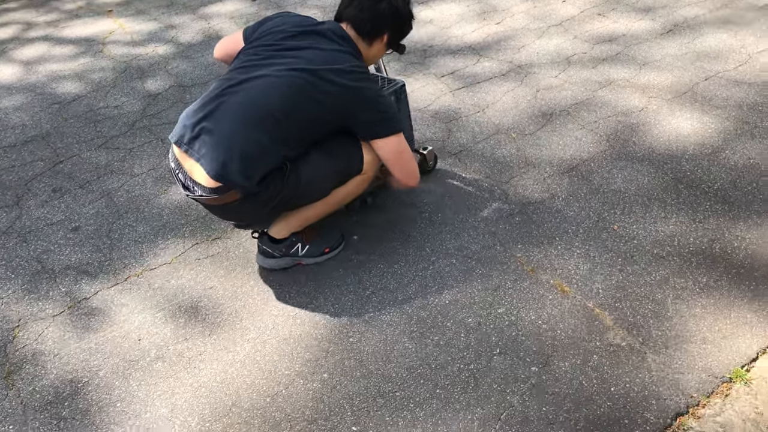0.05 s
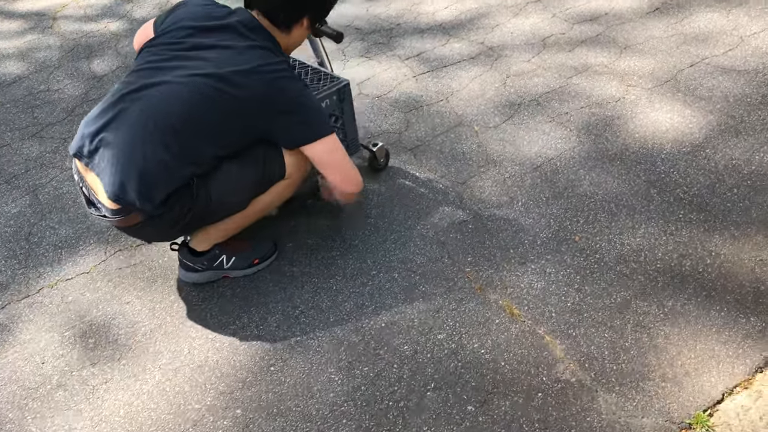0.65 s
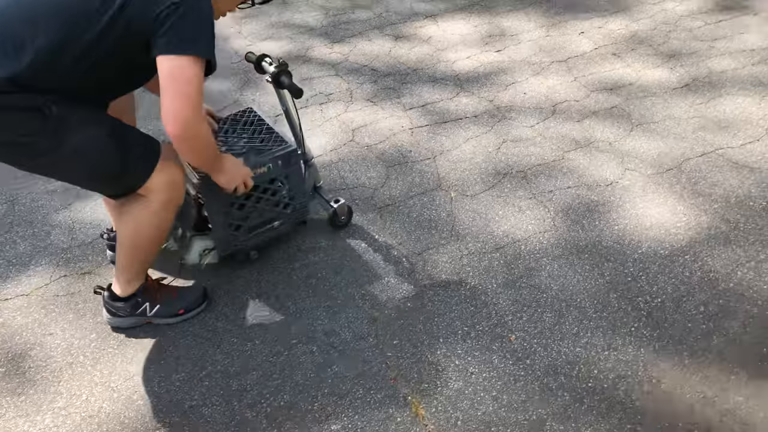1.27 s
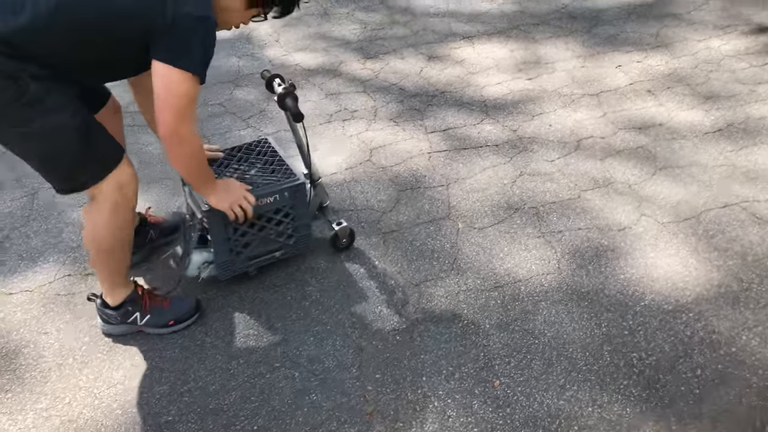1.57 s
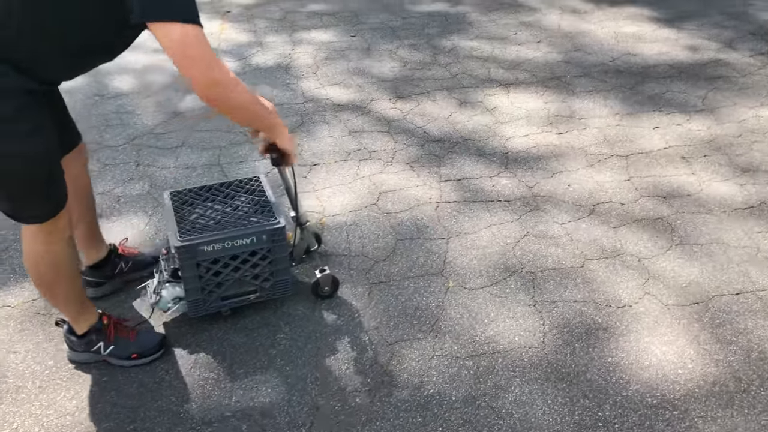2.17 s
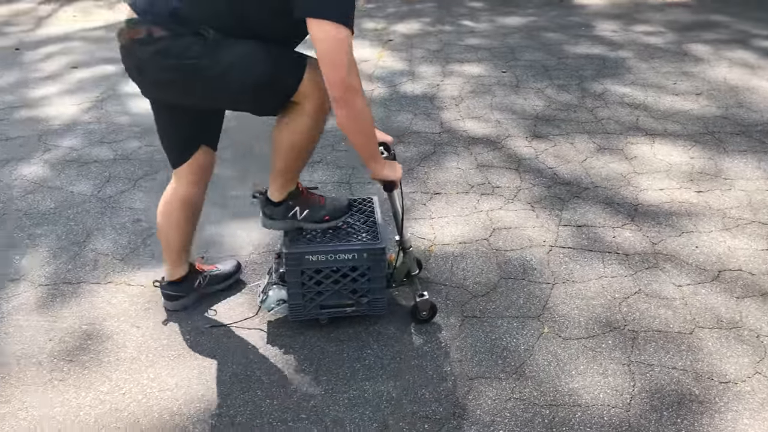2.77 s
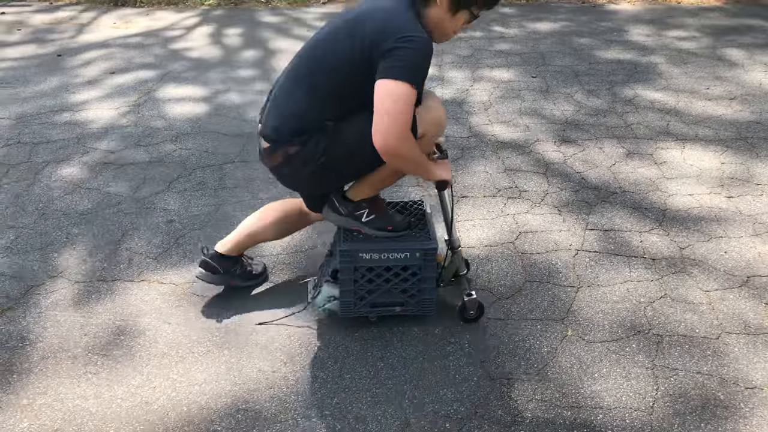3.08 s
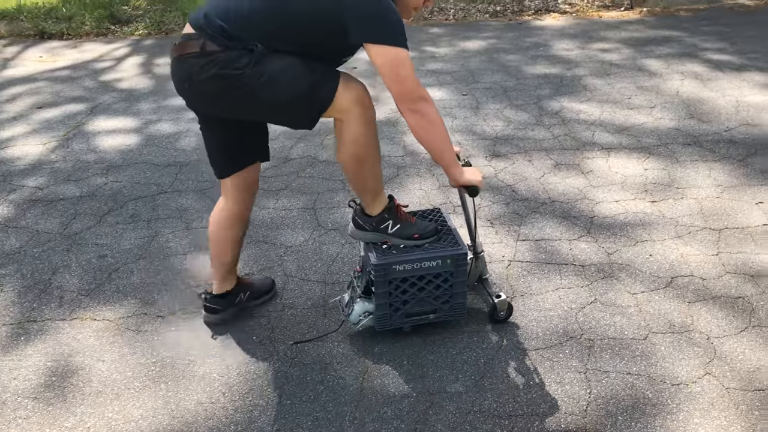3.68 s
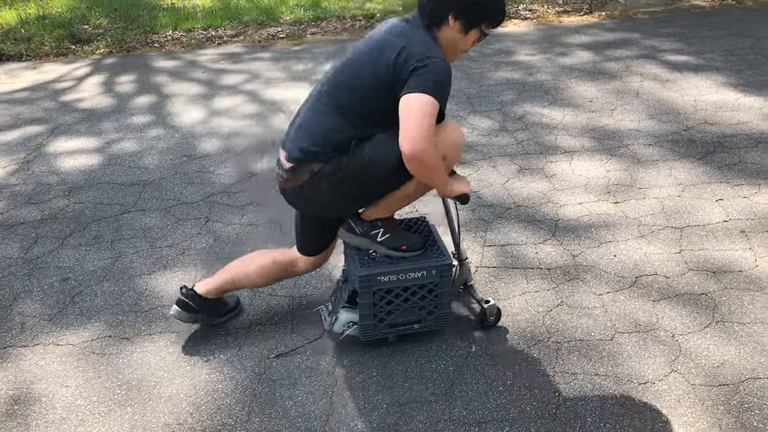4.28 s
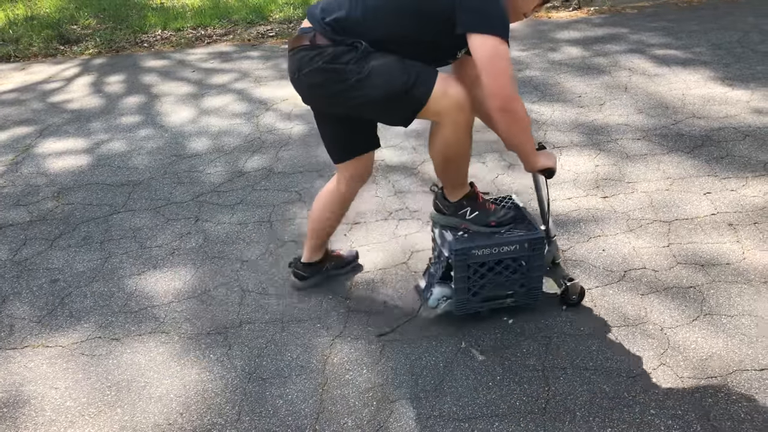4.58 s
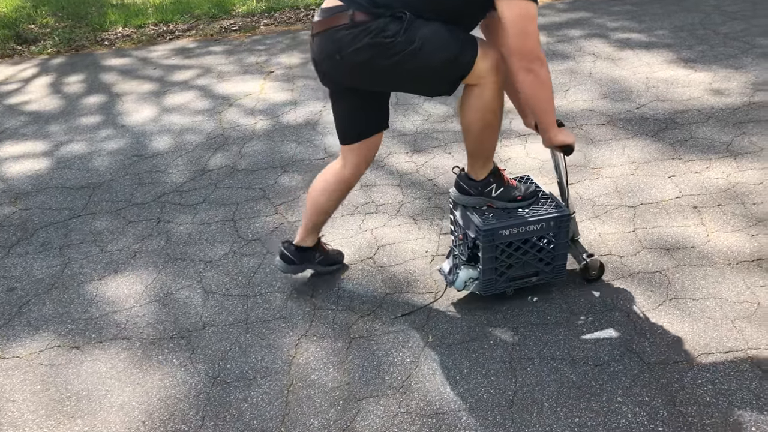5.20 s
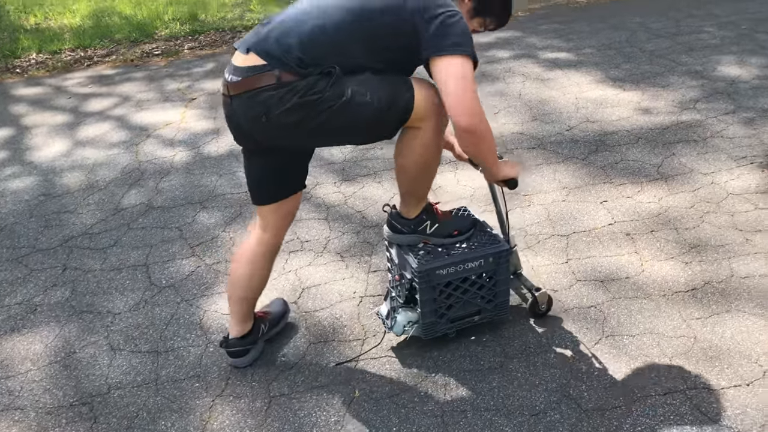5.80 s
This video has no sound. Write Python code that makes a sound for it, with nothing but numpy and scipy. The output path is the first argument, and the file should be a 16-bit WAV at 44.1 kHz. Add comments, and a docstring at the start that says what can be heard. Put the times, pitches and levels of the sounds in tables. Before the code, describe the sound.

Soft cloth rustle and a string of hollow plastic knocks come first, mixed with gritty scrapes as a home-made crate kart is dragged round on asphalt. Two loud runs of its drive follow, each under a second, with a lumpy wheel drumming fast while the chain and steel parts clatter. The kart then rolls out with a few small bumps and clinks. The sound is mono and close, outdoors, over a low rumble of distant traffic.

```python
"""A quiet asphalt street, one microphone, traffic far off. A home-made kart, a plastic crate on a
scooter frame, is handled: the crate knocks, clothes rustle, the wheels skid on grit as it is dragged
round. The rider steps on, and twice the drive spins up and runs down: a lumpy wheel thumps once a turn
while the chain and loose steel rattle. Then the kart jiggles over rough spots and coasts to a stop."""
import sys
import numpy as np
from scipy import signal
from scipy.fft import rfft, irfft
from scipy.io import wavfile
from scipy.ndimage import uniform_filter1d

SR = 44100
rng = np.random.default_rng(int(sys.argv[2]) if len(sys.argv) > 2 else 0)


def to_wav(s):
    """Save 16-bit WAV."""
    ch = np.atleast_2d(s).T  # columns
    pcm = np.round(np.clip(ch, -1, 1) * 32767)  # PCM
    wavfile.write(sys.argv[1], SR, pcm.astype(np.int16))


N = 257984
TIME = np.arange(N) / SR
RING = np.arange(SR // 3) / SR  # time within one blow, s
BASS, MIDDLE, TREBLE = (130, 570), (570, 2700), (2700, 17000)  # band edges, Hz
ATTACK_S = 0.012
FULL_SPEED = 35  # wheel turns per second

# the two runs of the drive, each a list of: t/s, wheel speed/(turns per s)
DRIVE_RUNS = [
    [(3.13, 14.46), (3.19, 18.36), (3.25, 35.55), (3.32, 37.41), (3.41, 35.41), (3.5, 22.7), (3.62, 4.13)],
    [(4.355, 6.99), (4.42, 25.06), (4.48, 34.78), (4.6, 32.91), (4.74, 29.39), (4.85, 19.06), (5.0, 5.57)],
]
# spectrum of steel hitting steel: f/Hz, level/dB
STEEL_SPECTRUM = [(300, 13.5), (650, -5), (1050, 0), (1900, -1.5), (2600, -8.5), (4000, -4.5), (6000, 5.5),
                  (8500, 1.5), (10000, -6), (13000, -7.5), (16000, -4)]
# broad resonances of the steel parts: f/Hz, width/Hz, level/dB relative to that spectrum
STEEL_PEAKS = [(1626, 240, 4), (3146, 107, 15), (3440, 190, 13), (4390, 230, 11.5), (6200, 300, 3.5),
               (6460, 250, 2.5), (8300, 550, -17), (11130, 940, 15.5), (14600, 197, 18.5)]
# clear ringing of the steel frame: f/Hz, level/dB, t60/s
STEEL_MODES = [(1067, -3.5, 0.092), (1497, 7, 0.094), (1603, -6, 0.32), (3020, -10.5, 0.43),
               (3365, 2, 0.16), (4646, -5.5, 0.36), (5880, -2, 0.092), (7040, 13.5, 0.043),
               (7030, 0, 0.033), (7650, -9, .14), (10000, -17, 0.29)]
# spectrum of the plastic crate: f/Hz, level/dB
CRATE_SPECTRUM = [(100, 4), (300, 9.5), (520, -5), (850, 1), (1600, 1.5), (2600, -13), (3500, -9),
                  (4700, -14), (6000, -22), (10000, -26), (16000, -35)]


def wheel(full_db=-16.5, growth=0.65):
    """One thump a turn, harder at speed; also gives the jolt that each turn passes to the chain."""
    # single slow bumps of a wheel: t/s, level/dB
    bumps = [(3.801, -34), (5.332, -26.5), (5.378, -52)]
    out, jolt, shape = np.zeros(N), np.zeros(N), thump()
    for run in DRIVE_RUNS:
        speed = np.interp(TIME, *np.transpose(run), left=0, right=0)
        turns = np.cumsum(speed) / SR
        jolt += np.cos(2 * np.pi * (turns - 0.08)) * (speed > 0)
        for i in np.flatnonzero(np.diff(np.floor(turns)) > 0):
            gain = amp(full_db + 0.18 * rng.standard_normal()) * (speed[i] / FULL_SPEED) ** growth
            add(out, TIME[i] - ATTACK_S, gain * shape)
    for s, db in bumps:
        add(out, s - ATTACK_S, amp(db) * shape)
    return out, jolt


def thump(lead_s=0.00625, touch_gain=0.52, touch_hz=190, slap_hz=165):
    """The lump touches, then slaps the road: two soft pushes, and the frame rings."""
    # low ringing of the loaded frame: f/Hz, level/dB, t60/s
    frame_modes = [(75, -14, 0.092), (99.7, -15, 0.12), (196.5, -7.5, 0.071), (223, -46, 0.037)]
    t = RING - ATTACK_S
    touch = (np.pi * touch_hz * (t + lead_s)) ** 2
    slap = (np.pi * slap_hz * t) ** 2
    pushes = touch_gain * (1 - 2 * touch) * np.exp(-touch) + (1 - 2 * slap) * np.exp(-slap)
    ring = sum(amp(db) * decay(t60) * np.sin(2 * np.pi * hz * RING) for hz, db, t60 in frame_modes)
    out = -pushes
    add(out, ATTACK_S, ring)
    return out


def rattle(jolt, jolt_db=-1.2, clump_db=3, busy_db=-30):
    """Links and loose parts hit each other hundreds of times a second; each part has its own pitch."""
    treble, middle = np.zeros(N), np.zeros(N)
    force = amp(jolt_db * jolt + clump_db * wander(0.0014))
    steel_shake, crate_shake = shake()
    busy = np.clip((steel_shake / amp(busy_db)) ** 0.4, 0.3, 1)  # gentle shaking gives fewer hits
    high_modes = [mode for mode in STEEL_MODES if mode[0] > TREBLE[0]]
    low_modes = [mode for mode in STEEL_MODES if mode[0] <= TREBLE[0]]
    for part_hz in np.geomspace(3200, 15500, num=10):
        peaks = STEEL_PEAKS + [(part_hz, part_hz / 6, 11)]
        tick = burst(STEEL_SPECTRUM, TREBLE, peaks, t60=0.018, tail_db=-21, tail_t60=0.13)
        clack = burst(STEEL_SPECTRUM, MIDDLE, STEEL_PEAKS, t60=0.036, tail_db=-13, tail_t60=0.11)
        tick_hits = force * grains(per_s=110 * busy, spread_db=2)
        treble += signal.oaconvolve(tick_hits, tick + amp(-13) * ringing(high_modes))[:N]
        clack_hits = force * grains(per_s=55 * busy, spread_db=0.5)
        middle += signal.oaconvolve(clack_hits, clack + amp(-8.5) * ringing(low_modes))[:N]
    shudder = force * noise(N, [(130, 2.5), (300, 4.5), (420, 0.5), (550, -21)], BASS)
    # the shaking sets the mean power; chance only shares it out among the hits
    clatter = amp(-2) * levelled(middle) + amp(-7) * shudder
    return amp(-1) * steel_shake * levelled(treble) + crate_shake * clatter


def shake(take_up_s=0.041, release_s=0.028):
    """How hard the steel and the crate are shaken: by rough spots, and as a power of wheel speed."""
    # jiggles over rough spots: t/s, hold/s, level/dB
    jiggles = [(3.091, 0.023, -48.5), (4.284, 0.028, -39.5), (5.026, 0.03, -43), (5.11, 0.017, -44.5),
               (5.169, 0.043, -55), (5.281, 0.049, -45.5), (5.356, 0.039, -47), (5.435, 0.076, -52),
               (5.532, 0.074, -47.5), (5.633, 0.02, -54.5)]
    steel = sum(amp(db) * spell(s, hold, 0.012, release_s) for s, hold, db in jiggles)
    crate = amp(-2) * steel
    for run in DRIVE_RUNS:
        s, turns_per_s = np.transpose(run)
        speed = np.interp(TIME, s, turns_per_s) / FULL_SPEED
        driven = spell(s[0], s[-1] - s[0], take_up_s, release_s)  # the chain takes up its slack
        steel += driven * amp(-23) * speed ** 2.12
        crate += driven * amp(-28.5) * speed ** 1.34
    return steel, crate


def knocks(hard_db=-32.5, rebound_s=0.0155):
    """Hands and feet hit the crate; after a hard blow it drops back with a softer, duller knock."""
    # blows: t/s, level/dB, bass/dB and treble/dB relative to it, panel f/Hz, rib f/Hz
    blows = [(0.757, -44.5, -20, -14, 1120, 3100), (0.820, -33.5, -23, -1, 2220, 3200),
             (0.843, -40.5, -10, 0, 1880, 3240), (0.875, -46.5, -4, -4.5, 1920, 3150),
             (0.920, -39, -9, -14.5, 1045, 3200), (0.976, -31.5, -3.5, -3, 870, 3450),
             (1.02, -41, 1, -9, 1220, 3480), (1.073, -44.5, -2.5, -3.5, 960, 4520),
             (1.187, -41, -16, -5, 2260, 3050), (1.196, -25, -12, -9.5, 2080, 3100),
             (1.414, -41, 1, -6, 1460, 4050), (1.436, -27.5, -9.5, -12.5, 817, 4780),
             (1.510, -28.5, -6, -9, 827, 4120), (1.576, -38.5, -26, -17, 850, 3500),
             (1.597, -27, -28, -13, 880, 3590), (1.606, -29.5, -10.5, -1.5, 1050, 3490),
             (1.644, -36.5, -15, -22, 980, 3720), (1.678, -50.5, -24, 4.5, 860, 4620),
             (1.804, -37, -10, -0.5, 1390, 3330), (2.931, -38.5, -12, -17.5, 1400, 4170),
             (3.699, -43, -7, -17, 1346, 2900), (3.787, -32.5, -1.5, -0.5, 1650, 3910),
             (4.694, -25.5, -4, -24, 1430, 4590), (5.275, -43, -26, -8.5, 1480, 2860),
             (5.373, -37.5, 2.5, -4, 1400, 3120), (5.440, -42, -10, -0.5, 1980, 4350),
             (5.754, -51, -21, -6.5, 1500, 4400)]
    out = np.zeros(N)
    dull = signal.butter(2, 1950, fs=SR, output="sos")
    for s, db, bass_db, treble_db, panel_hz, rib_hz in blows:
        blow = amp(db) * knock(bass_db, treble_db, panel_hz, rib_hz)
        add(out, s, blow)
        if db > hard_db:
            add(out, s + rebound_s, amp(-9.5) * signal.sosfilt(dull, blow))
    return out


def knock(bass_db, treble_db, panel_hz, rib_hz, t60=0.042, seat_s=0.0016):
    """One blow: a dry crack, the struck panel and its ribs sing briefly, and the whole crate rings."""
    # ringing of the crate: f/Hz, level/dB, t60/s
    crate_modes = [(271.7, -8.5, 0.34), (670, -8, 0.2), (835, 0.5, 0.18), (914, -4, 0.37),
                   (1110, -11, 0.15), (1350, 5, 0.06), (1403, 10.5, 0.058), (1726, 9, 0.043),
                   (3420, -27, 0.02), (4100, -17, 0.047)]
    give = amp(-9 * np.exp(-RING / seat_s))  # loose plastic touches lightly before it seats
    panel = burst(CRATE_SPECTRUM, MIDDLE, (), t60, tail_db=-28, tail_t60=0.23)
    panel += amp(-1) * ringing([(panel_hz, 0, 0.025)])
    rib = burst(CRATE_SPECTRUM, TREBLE, (), 0.63 * t60, tail_db=-71, tail_t60=0.099)
    rib += amp(-3) * ringing([(rib_hz, 0, 0.026)])
    thud = burst(CRATE_SPECTRUM, BASS, (), 3 * t60, tail_db=-29, tail_t60=0.14)
    body = amp(bass_db) * thud + amp(-10) * ringing(crate_modes)
    return struck(give * panel) + amp(treble_db) * struck(give * rib) + give * body


def clinks(soft_db=-45, ring_db=-15, rise_s=0.0002):
    """The chain snatches and steel fittings snap against each other; harder contacts are brighter."""
    # steel contacts, and at 3.0 s one dull knock with a ringing treble: t/s, treble level/dB, tilt/(dB per
    # octave), t60/s
    contacts = [(0.259, -56, -2.5, 0.048), (1.776, -41.5, 5, 0.017), (1.792, -33.5, 4.5, 0.08),
                (1.874, -43.5, 4, 0.022), (1.894, -47.5, 9, 0.035), (2.512, -47.5, 0, 0.04),
                (2.534, -46, -4, .08), (3.001, -46.5, -18, 0.032), (3.069, -43.5, -3.5, 0.078),
                (3.166, -31.5, 2.5, 0.097), (3.204, -23.5, 2.5, 0.21), (3.459, -22, 2, 0.043),
                (3.501, -22.5, 2, 0.051), (3.509, -27, 0, 0.047), (3.529, -27.5, -1, 0.059),
                (3.601, -37.5, -9, 0.081), (3.666, -49, 1, 0.032), (4.031, -53.5, 2, 0.027),
                (4.054, -50, -3.5, 0.026), (4.136, -46, -5, 0.03), (4.213, -46.5, 4, 0.021),
                (4.285, -25.5, 0.5, 0.015), (4.360, -33, -3.5, 0.18), (4.549, -25, -3, .05),
                (4.814, -31.5, 3, 0.026), (4.833, -29, 1, 0.086), (4.937, -40.5, 0, 0.03),
                (4.967, -45, -14, 0.05), (5.004, -46.5, -5, 0.041), (5.049, -36, -2.5, 0.024),
                (5.162, -45.5, -15, .037), (5.453, -41, 2, 0.082)]
    out = np.zeros(N)
    rise = 1 - np.exp(-RING / rise_s)
    for s, db, tilt_db, t60 in contacts:
        treble = burst(tilted(STEEL_SPECTRUM, tilt_db), TREBLE, STEEL_PEAKS, t60, -26, tail_t60=0.23)
        middle = burst(STEEL_SPECTRUM, MIDDLE, STEEL_PEAKS, t60, tail_db=-12, tail_t60=0.2)
        middle_db = -4.5 - 0.33 * (db - soft_db)
        clink = treble + amp(middle_db) * middle + amp(ring_db) * ringing(STEEL_MODES)
        add(out, s, amp(db) * rise * clink)
    return out


def drag(band_hz=(330, 17000)):
    """Grit catches under the skidding wheels and sounds through the crate."""
    # sideways skids as the kart is shifted, then swung round: t/s, hold/s, level/dB
    skids = [(0.801, 0.081, -47.5), (0.961, .08, -45.5), (1.16, 0.071, -45.5), (1.394, 0.22, -46),
             (1.77, 0.09, -51), (2.256, 0.057, -44), (2.331, 0.062, -36.5)]
    grit = np.zeros(N)
    for _ in range(4):
        scratch = burst(CRATE_SPECTRUM, band_hz, [(1140, 410, 2.5)], t60=0.026, tail_db=-33, tail_t60=0.1)
        grit += signal.oaconvolve(grains(per_s=260, spread_db=1.5), scratch)[:N]
    gain = sum(amp(db) * spell(s, hold, attack_s=0.012, release_s=0.01) for s, hold, db in skids)
    return gain * unit(grit)


def rustle(trim_db=-1, sand_db=-2):
    """Soft, uneven friction of cloth, and sand crackling under the soles."""
    # the rider's movements: t/s, hold/s, relative level/dB, tilt/(dB per octave)
    movements = [(0.038, 0.23, -71.5, 4), (0.538, 0.32, -60, 1), (.86, 0.27, -56.5, -15),
                 (1.043, .15, -55, 5), (1.2, 0.32, -59.5, -1.5), (1.401, .25, -53.5, 0),
                 (1.72, .18, -54.5, 1), (2.0, 0.34, -60.5, -2.5), (2.253, 0.33, -59, 0),
                 (2.577, .37, -67.5, 3), (2.938, 0.27, -55.5, -4), (3.612, 0.35, -60.5, -3)]
    # spectrum of cloth and sand: f/Hz, level/dB
    rustle_spectrum = [(1500, 8.5), (2500, -4), (4000, 4.5), (6000, -7.5), (9000, -10.5), (13000, -10),
                       (16000, -15)]
    out = np.zeros(N)
    unevenness = amp(2.2 * wander(0.008))
    grit = grains(per_s=220, spread_db=-0.5)
    for s, hold, db, tilt_db in movements:
        start = round(s * SR)
        second = slice(start, start + SR)
        colour = tilted(rustle_spectrum, tilt_db)
        cloth = unevenness[second] * noise(SR, colour, (1500, 17000))
        crackle = burst(colour, TREBLE, (), t60=0.004, tail_db=-28, tail_t60=0.05)
        sand = signal.oaconvolve(grit[second], crackle)[:SR]
        gain = amp(db + trim_db) * spell(s, hold, attack_s=0.038, release_s=0.036)[second]
        add(out, s, gain * (cloth + amp(sand_db) * unit(sand)))
    return out


def street(swell_db=-1.5):
    """Far traffic: a low rumble that wavers and slowly swells."""
    # course of the traffic's rumble: t/s, level/dB
    traffic_levels = [(0, -53), (1.5, -50.5), (2.2, -50), (2.8, -48.5), (3.9, -51), (5.85, -50.5)]
    # spectrum of traffic from a distance: f/Hz, level/dB
    traffic_spectrum = [(25, -8), (45, -1), (70, -2), (125, 0.5), (220, -7.5), (440, -15.5), (960, -18),
                        (1300, -20.5), (1700, -18), (2350, -26), (3500, -28.5), (5900, -34), (16000, -41.5)]
    level_db = np.interp(TIME, *np.transpose(traffic_levels)) + swell_db * wander(0.07)
    return amp(level_db) * noise(N, traffic_spectrum)


def burst(colour, band, peaks, t60, tail_db, tail_t60):
    """One contact: a quick crack and a weak tail."""
    return struck(noise(len(RING), colour, band, peaks) * (decay(t60) + amp(tail_db) * decay(tail_t60)))


def ringing(modes, scatter_db=3):
    """Dying partials (f/Hz, level/dB, t60/s), mixed anew by the place of each blow."""
    out = np.zeros(len(RING))
    for hz, db, t60 in modes:
        gain = amp(db + scatter_db * rng.standard_normal())
        out += gain * decay(t60) * np.sin(2 * np.pi * (hz * RING + rng.random()))
    return struck(out)


def grains(per_s, spread_db):
    """Random clicks of uneven size."""
    size = amp(spread_db * np.minimum(rng.exponential(1, N), 3))
    return size * rng.choice([-1, 1], N) * (rng.random(N) < per_s / SR)


def noise(size, colour, band=None, peaks=()):
    """Noise of rms 1 with a smooth colour, raised at resonances and kept to a band."""
    hz = np.fft.rfftfreq(size, 1 / SR) + 1
    colour_hz, colour_db = np.transpose(colour)
    gain = amp(np.interp(np.log(hz), np.log(colour_hz), colour_db))
    peak_power = sum(amp(db) ** 2 / (1 + (2 * (hz - centre) / width) ** 2) for centre, width, db in peaks)
    gain *= np.sqrt(1 + peak_power)
    if band:
        gain /= np.sqrt((1 + (band[0] / hz) ** 10) * (1 + (hz / band[1]) ** 20))
    return unit(irfft(rfft(rng.standard_normal(size)) * gain, size))


def tilted(colour, tilt_db):
    """A colour made brighter by so many dB an octave."""
    return [(hz, db + tilt_db * np.log2(hz)) for hz, db in colour]


def wander(seconds):
    """Random drift of rms 1 that changes over the given time."""
    size = int(seconds * SR)
    return unit(uniform_filter1d(uniform_filter1d(rng.standard_normal(N), size), size))


def spell(start, hold, attack_s, release_s):
    """Gain of one movement: it swells, holds and dies away."""
    t = TIME - start
    return np.clip(t / attack_s, 0, 1) * np.exp(-np.maximum(t - hold, 0) / release_s)


def decay(t60):
    """Dies by 60 dB in t60 seconds."""
    return np.exp(-np.log(1000) * RING / t60)


def struck(sound):
    """Scales a blow so that its attack has rms 1."""
    return sound / np.sqrt(np.mean(sound[:int(ATTACK_S * SR)] ** 2) + 1e-20)


def levelled(x):
    """Holds the rms near 1 over a sliding 36 ms."""
    return x / np.sqrt(abs(uniform_filter1d(x ** 2, size=1600)) + 1e-6)


def unit(x):
    """Scales to rms 1."""
    return x / np.sqrt(np.mean(x ** 2) + 1e-20)


def amp(db):
    """Decibels to gain."""
    return 10 ** (np.asarray(db) / 20)


def add(mix, s, sound):
    """Mixes a sound in at time s."""
    part = mix[max(round(s * SR), 0):][:len(sound)]
    part += sound[:len(part)]


def scene():
    """The kart and its rider in front, the traffic far behind, in mono."""
    thumps, jolt = wheel()
    return (thumps + rattle(jolt) + knocks() + clinks() + drag() + rustle() + street())[None]


def record(dry, low_cut_hz=49.3, top_hz=15850):
    """The microphone loses the deepest bass; the recorder cuts the highest treble."""
    low_cut = signal.butter(3, low_cut_hz, "highpass", fs=SR, output="sos")
    thin = signal.sosfiltfilt(low_cut, dry, padtype="even", padlen=4096)
    band_limit = signal.firwin(601, top_hz, window=("kaiser", 8), fs=SR)
    return signal.oaconvolve(thin, band_limit[None], "same")


dry = scene()
out = record(dry)
to_wav(out)
```